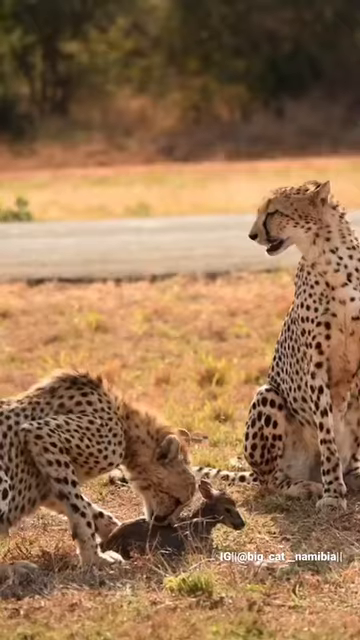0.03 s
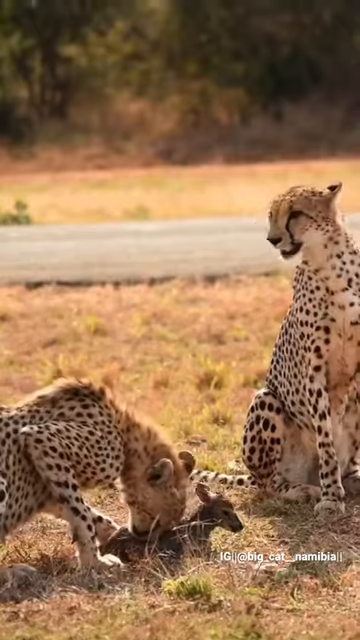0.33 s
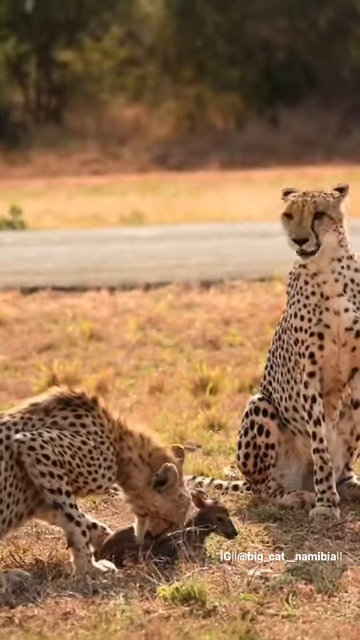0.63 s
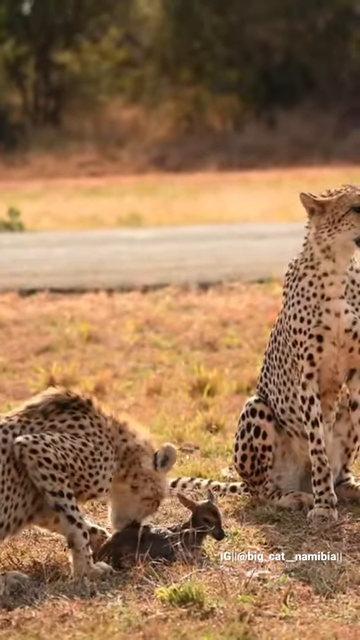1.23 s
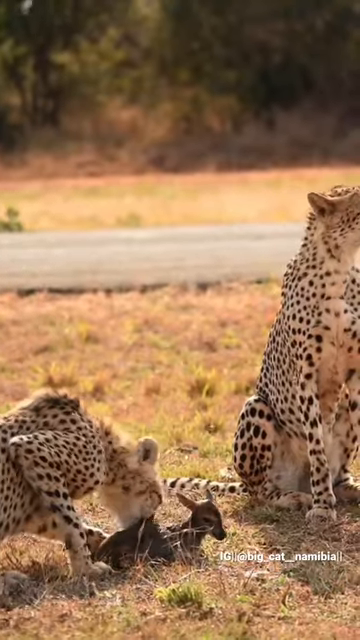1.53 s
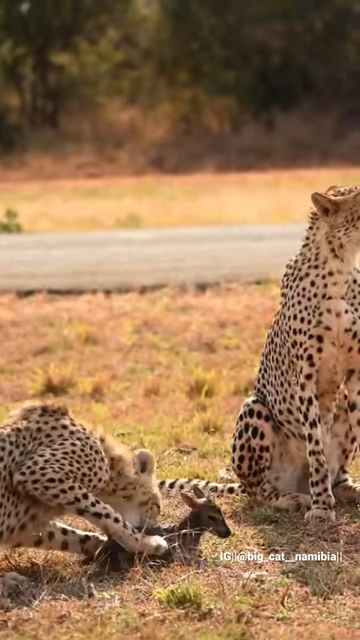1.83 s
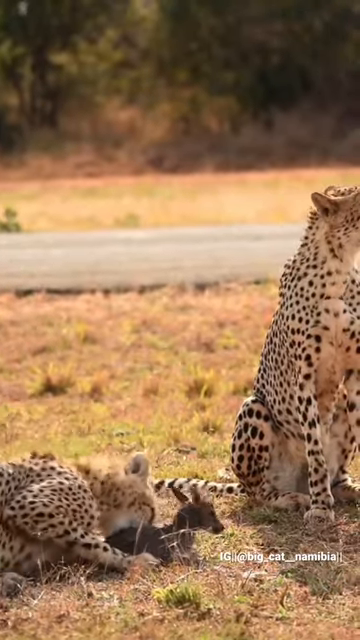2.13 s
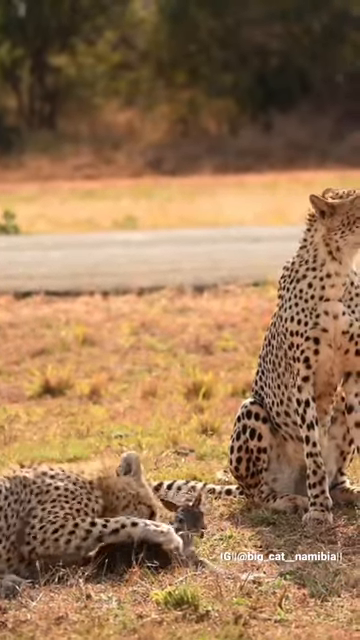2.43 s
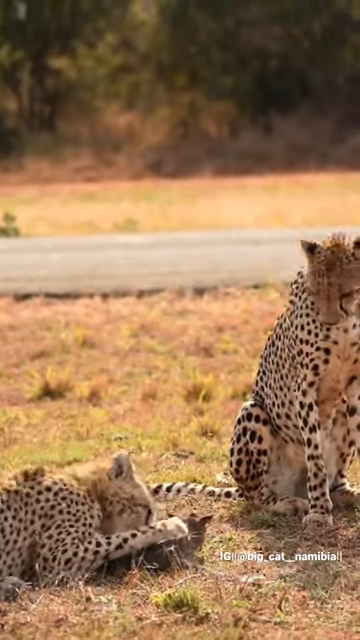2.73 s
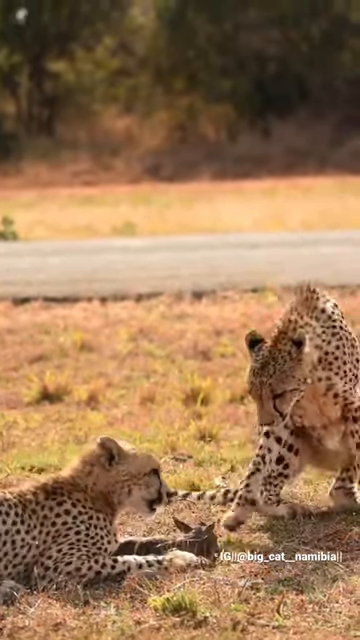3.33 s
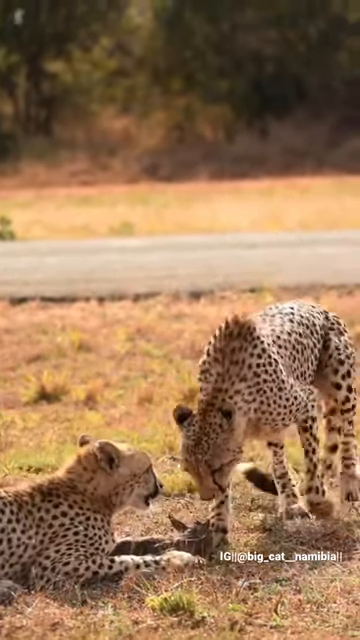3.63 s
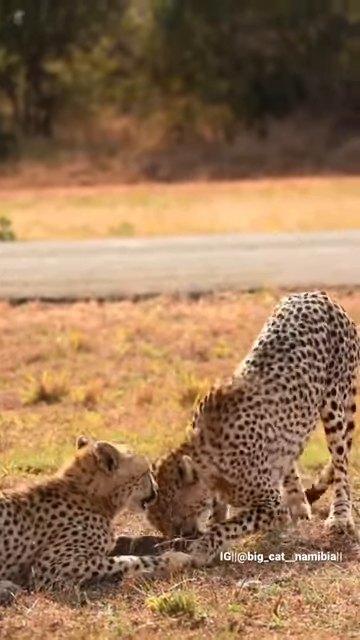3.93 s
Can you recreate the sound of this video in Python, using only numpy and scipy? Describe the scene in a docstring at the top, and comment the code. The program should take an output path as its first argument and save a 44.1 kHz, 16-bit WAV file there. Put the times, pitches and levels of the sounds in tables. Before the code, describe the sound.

A young antelope gives one long, high bleat amid wind thumping on the microphone.

```python
"""Antelope calf in the wind

On open grassland a young antelope, held down by a cheetah, gives one long, high, slightly raspy
bleat, near the middle between the two microphone ports. Gusts rumble and thump right on the ports,
each on its own. Far behind lie a soft hiss of grass, a wavering hum and a few thin bird chirps."""
import sys
import numpy as np
from scipy import signal
from scipy.fft import rfft, irfft, next_fast_len
from scipy.io import wavfile
from scipy.ndimage import map_coordinates

SR = 44100
rng = np.random.default_rng(int(sys.argv[2]) if len(sys.argv) > 2 else 0)


def generate_wav(sig):
    """Save sig (samples, or channels by samples) to the path in sys.argv[1] as 16-bit PCM at SR."""
    pcm = np.round(np.clip(np.atleast_2d(sig).T, -1, 1) * 32767).astype(np.int16)
    wavfile.write(sys.argv[1], SR, pcm)


N = 176400


def amp(db):
    """Decibels to gain."""
    return 10 ** (np.asarray(db) / 20)


def unit(x):
    """Scale to rms 1."""
    return x / np.sqrt(np.mean(x ** 2) + 1e-20)


def along(points, hz):
    """Interpolate (freq_hz, value) points on a log frequency axis."""
    freqs, values = np.transpose(points)
    return np.interp(np.log(hz + 1), np.log(freqs + 1), values)


def curves(rows, outside=None):
    """One value per sample for each column after the time."""
    times, *columns = np.transpose(rows)
    return [np.interp(np.arange(N) / SR, times, column, outside, outside) for column in columns]


def wobble(rate, size=N):
    """A smooth random curve, rate knots a second."""
    at = np.arange(size) * rate / SR
    knots = rng.standard_normal(int(at[-1]) + 4)
    return np.interp(at, at[::32], map_coordinates(knots, [at[::32]]))


def filtered(x, response):
    """Filter x by a gain given as a function of frequency."""
    size = next_fast_len(N + SR // 2)
    return irfft(rfft(x, size) * response(np.fft.rfftfreq(size, 1 / SR)), size)[..., :N]


def noise(colour):
    """Coloured noise of rms 1."""
    return unit(filtered(rng.standard_normal(N), lambda hz: amp(along(colour, hz))))


def add(out, start_s, x):
    """Mix x into out from start_s on."""
    part = out[..., round(start_s * SR):][..., :x.shape[-1]]
    part += x[..., :part.shape[-1]]


def glide(length_s, from_hz, to_hz, waver, rate):
    """A tone that wavers in pitch and level, with a rounded rise and fall."""
    u = np.linspace(0, 1, int(length_s * SR))
    hz = (from_hz + (to_hz - from_hz) * u) * (1 + waver * wobble(rate, len(u)))
    envelope = np.sin(np.pi * u) * amp(6.1 * wobble(rate, len(u)))
    return envelope * np.sin(2 * np.pi * np.cumsum(hz) / SR)


def grassland(x, wet_db, t60_s):
    """Add a short scatter from ground and bushes, different at each port."""
    t = np.arange(SR // 2) / SR
    tail = rng.standard_normal((2, len(t))) * amp(-60 * t / t60_s)
    tail /= np.linalg.norm(tail[0])
    return x + amp(wet_db) * signal.fftconvolve(x[None], tail, axes=1)[:, :N]


# Air and grass all around the microphone: freq_hz, relative_density_db
HUSH_COLOUR = [(25, -17.5), (64, -4), (130, -4.5), (190, -14), (265, -5), (430, -19), (600, -20.5),
               (900, -21.5), (3600, -30), (11000, -35.5), (13000, -42.5)]
# How alike the two ports hear it: freq_hz, correlation
HUSH_LIKENESS = [(60, 0.22), (230, 1), (870, 0.7), (3300, 0.23)]

def hush():
    """The steady hush of the open plain, narrowest in the low mids and wide in the hiss."""
    def mid_side_gains(hz):
        angle = np.arccos(along(HUSH_LIKENESS, hz)) / 2
        return np.array([np.cos(angle), np.sin(angle)])
    mid, side = filtered(np.array([noise(HUSH_COLOUR), noise(HUSH_COLOUR)]), mid_side_gains)
    return amp(-48.5 + 0.18 * wobble(5.5)) * unit(np.array([mid + side, mid - side]))


# A hum far across the plain: start_s, length_s, pitch_hz, level_db
HUM_TONES = [(0.17, 0.29, 243, -43), (0.637, 0.17, 319.4, -39.5), (0.59, 0.8, 280, -48),
             (0.7, 0.74, 240, -49.5)]

def far_hum():
    """Low, distant tones that come and go and waver."""
    out = np.zeros(N)
    for start_s, length_s, pitch_hz, level_db in HUM_TONES:
        add(out, start_s, amp(level_db) * glide(length_s, pitch_hz, pitch_hz, waver=0.0154, rate=24.3))
    return out


# Birds a long way off: start_s, length_s, from_hz, to_hz, level_db
BIRD_CHIRPS = [(0.396, 0.055, 4260, 5220, -60), (0.459, 0.029, 3520, 4140, -61),
               (0.879, 0.067, 8000, 6500, -58), (3.512, 0.054, 3900, 4540, -58),
               (3.588, 0.035, 5480, 5080, -59), (3.682, 0.036, 5600, 8000, -57.5),
               (3.757, 0.04, 4900, 6900, -57.5)]

def far_birds():
    """Thin, quick whistled glides."""
    out = np.zeros(N)
    for start_s, length_s, from_hz, to_hz, level_db in BIRD_CHIRPS:
        add(out, start_s, amp(level_db) * glide(length_s, from_hz, to_hz, waver=0.0295, rate=220))
    return out


# Gusts reaching the microphone: start_s, length_s, level_db
WIND_GUSTS = [(0.163, 0.027, -45), (0.419, 0.18, -41.5), (0.504, 0.033, -27), (1.122, 0.055, -31.5),
              (1.258, 0.098, -28), (1.42, 0.038, -17.5), (1.475, 0.067, -30.5), (1.523, 0.038, -19),
              (1.561, 0.027, -16), (1.615, 0.062, -14), (1.7, 0.11, -29.5), (1.784, 0.12, -24),
              (1.937, 0.18, -29), (2.156, 0.12, -20.5), (2.31, 0.033, -18.5), (2.374, 0.088, -28.5),
              (2.543, 0.13, -34.5), (2.719, 0.085, -33), (2.988, 0.032, -32.5), (3.136, 0.27, -30),
              (3.294, 0.047, -19.5), (3.506, 0.042, -22.5), (3.567, 0.021, -14), (3.614, 0.0054, -14),
              (3.645, 0.029, -15.5), (3.704, 0.15, -16), (3.869, 0.13, -22.5)]
# Turbulence at a port in a full gust, and the extra each band loses as the wind weakens:
# low_hz, high_hz, relative_db, extra_db_per_db
TURBULENCE_BANDS = [(28.6, 76.6, -8.5, -0.45), (64.7, 188, 0.5, 0), (200, 359.5, -3, 1.12),
                    (366, 655, -11, 2), (646, 1142, -22, 3.5), (1110, 2160, -36.5, 1.5)]

def wind_rumble():
    """Both ports share the gusts, each with its own turbulence; stronger wind sheds higher eddies."""
    rise_s, fall_s, lull_db, full_gust_db = 0.0078, 0.026, -57.5, -14.5
    t = np.arange(N) / SR
    power = amp(lull_db + 0.72 * wobble(8.76)) ** 2
    for start_s, length_s, level_db in WIND_GUSTS:
        end_s = start_s + length_s
        envelope = np.interp(t, [start_s - rise_s, start_s, end_s, end_s + fall_s], [0, 1, 1, 0])
        power += (amp(level_db) * envelope) ** 2
    gust_db = 10 * np.log10(power)
    lumps = 1.8 * (np.array([wobble(70), wobble(70)]) - .3)
    out = np.zeros((2, N))
    for low_hz, high_hz, relative_db, growth in TURBULENCE_BANDS:
        bandpass = signal.butter(4, [low_hz, high_hz], "band", fs=SR, output="sos")
        band = unit(signal.sosfilt(bandpass, rng.standard_normal((2, N))))
        band_db = gust_db + relative_db + growth * (gust_db - full_gust_db)
        out += band * amp(band_db + (1.5 + growth / 2) * lumps)
    return out


# Single eddies right on the ports: time_s, level_db, centre_hz, left_minus_right_db
PORT_THUMPS = [(0.513, -12.5, 108, 21), (1.267, -12, 86, 10), (1.427, -4.5, 340, -6),
               (1.475, -13, 214, -19), (1.564, 0, 342, -36), (1.582, -11.5, 258, -5),
               (1.6214, -2.5, 294, 31), (1.644, -5, 420, 13), (1.657, -0.5, 406, 29), (1.669, -5, 345, 18),
               (1.693, -6, 188, 29), (1.852, -6.5, 148, 30), (1.887, -10.5, 136, 17), (2.263, -9, 203, -23),
               (2.349, -6, 223, 18), (3.51, -17.5, 140, 5), (3.576, -3.5, 345, -32), (3.587, -3, 293, -25),
               (3.613, -4, 197, -0.5), (3.639, -3, 298, -29), (3.653, -4.5, 230, 7),
               (3.675, -4.5, 222, -21), (3.747, -1, 318, 16), (3.755, -8.5, 196, 2), (3.786, -7, 265, -17),
               (3.833, 0, 288, 15), (3.853, -3, 293, 15), (3.957, -12, 188, -5)]
# The snap of a hard hit on a port: freq_hz, relative_density_db
SNAP_SPECTRUM = [(500, 2.5), (2000, 7.5), (4500, -6.5), (9000, -17), (13000, -33)]

def wind_thumps():
    """Each eddy is a pull, push and pull of pressure, higher the smaller it is; the hardest also snap."""
    full_snap_db, snap_db_per_db, snap_t60_s = -26, 3.3, 0.019
    out = np.zeros((2, N))
    t = np.arange(-SR // 20, SR // 20) / SR
    hiss = noise(SNAP_SPECTRUM)
    for time_s, level_db, centre_hz, pan_db in PORT_THUMPS:
        u = np.pi * centre_hz * t
        pressure = amp(level_db) * (1 - 3 * u ** 2) / (1 + u ** 2) ** 3
        snap_db = full_snap_db + snap_db_per_db * level_db - 60 * np.abs(t) / snap_t60_s
        snap = (t >= 0) * amp(snap_db) * np.roll(hiss, -round(time_s * SR))[:len(t)]
        sides = amp([[pan_db / 2], [-pan_db / 2]])
        add(out, time_s + t[0], sides / sides.max() * (pressure + snap))
    return out


# The calf's breath, as heard at the microphone: time_s, level_db
RASP_LEVEL = [(2.265, -95), (2.28, -50), (2.53, -44), (2.64, -48.5), (2.89, -55.5), (2.97, -54),
              (3.13, -63.5), (3.38, -56), (3.46, -67)]
# Its colour: freq_hz, relative_density_db
RASP_SPECTRUM = [(900, -34), (1400, -48), (2100, -4.5), (2700, -47), (3750, -31), (4300, -2), (5700, 1.5),
                 (6300, -14), (7500, -3.5), (9300, -7.5), (10100, -18), (11300, -6.5), (13000, -26)]

def throat_rasp(phase):
    """Air rasps in the throat, pulsing once per cycle of the voice."""
    breath = unit(noise(RASP_SPECTRUM) * (1 + .6 * np.cos(phase)))
    return breath * amp(curves(RASP_LEVEL, outside=-120)[0] + 1.2 * wobble(29.9))


# Four shapes of the calf's mouth: relative_db for each of harmonics 1 to 15
MOUTH_OPENING = [-31, -3.5, -14, -15.5, -6.5, 0, -8, -9, -15, -15, -21, -15, -38, -24, -24]
MOUTH_GAPING = [-18.5, -2.5, -0.5, -17, -4, -9.5, -3, -17, -13, -7.5, -6, -34, -8.5, -12.5, -26]
MOUTH_NARROWING = [-24.5, -7.5, 0.5, -25, -19, -12.5, -9, -12, -12, -14, -18, -17.5, -19.5, -24, -28]
MOUTH_CLOSING = [-23, -2, 0.5, -13.5, -7.5, -12, -7.5, -17, -18, -18, -13, -12, -17, -13, -31]
# Start and end of each change of shape: time_s
MOUTH_TIMES = [2.37, 2.44, 2.7, 2.87, 3.04, 3.15]

def mouth_shape_db(t, harmonic_hz):
    """The moving mouth weights the harmonics; a throat resonance stands out as it closes."""
    throat_hz, half_width_hz, throat_db = 4650, 280, 17
    shapes = [MOUTH_OPENING, MOUTH_GAPING, MOUTH_GAPING, MOUTH_NARROWING, MOUTH_NARROWING, MOUTH_CLOSING]
    shape_db = np.array([np.interp(t, MOUTH_TIMES, levels) for levels in np.transpose(shapes)])
    closed = np.interp(t, MOUTH_TIMES[-2:], [0, 1])
    return shape_db + closed * throat_db / (1 + ((harmonic_hz - throat_hz) / half_width_hz) ** 2)


# The calf's cry, rising and then sagging: time_s, pitch_hz
BLEAT_PITCH = [(2.271, 712), (2.334, 791), (2.396, 802), (2.449, 830), (2.562, 846.6), (2.659, 823.3),
               (2.741, 832.8), (2.811, 818.5), (2.889, 818.5), (2.999, 802.7), (3.12, 779), (3.26, 759),
               (3.35, 710), (3.44, 622)]
# Its three registers at the microphone: time_s, low_db, middle_db, treble_db
BLEAT_LEVELS = [(2.24, -58, -82, -88), (2.272, -57, -62, -82), (2.28, -42.5, -42, -48),
                (2.33, -41, -31.5, -43), (2.39, -36, -31.5, -39.5), (2.44, -33, -31, -33),
                (2.56, -30, -40.5, -37), (2.65, -34.5, -48, -40), (2.77, -31.5, -38.5, -39),
                (2.92, -30.5, -40, -38.5), (3.07, -34, -41.5, -42.5), (3.115, -42.5, -50.5, -51),
                (3.28, -44, -47, -56), (3.32, -45.5, -64, -61), (3.38, -44.5, -46, -71),
                (3.45, -63.5, -68, -80)]

def bleat():
    """A stack of harmonics, shaped by the mouth and frayed at the top, over a rasp of breath."""
    middle_from_hz, treble_from_hz, jitter, shimmer = 3600, 6200, 0.0013, 0.067
    t = np.arange(N) / SR
    pitch_hz = curves(BLEAT_PITCH)[0] * (1 + jitter * wobble(160) + 0.00059 * wobble(24.8))
    phase = 2 * np.pi * np.cumsum(pitch_hz) / SR
    voiced = (t > BLEAT_LEVELS[0][0]) & (t < BLEAT_LEVELS[-1][0])
    orders = np.arange(1, len(MOUTH_GAPING) + 1)[:, None]
    typical_hz = orders * np.median(np.array(BLEAT_PITCH)[:, 1])

    def wobble_each(rate):
        return np.array([wobble(rate, voiced.sum()) for _ in orders])
    shape_db = mouth_shape_db(t[voiced], orders * pitch_hz[voiced])
    drift_db = 2.42 * np.sqrt(orders / orders.mean()) * wobble_each(24.88)
    fray_depth = .29 * np.minimum(typical_hz / middle_from_hz, 1) ** 4
    fray = 1 + fray_depth * (wobble_each(90) + .5j * wobble_each(90))  # in level and in phase
    harmonics = amp(shape_db + drift_db) * np.imag(fray * np.exp(1j * orders * phase[voiced]))
    register = np.digitize(typical_hz[:, 0], [middle_from_hz, treble_from_hz])
    voice = np.zeros(N)
    for i, level_db in enumerate(curves(BLEAT_LEVELS)):
        shape_rms = np.sqrt(np.sum(amp(shape_db[register == i]) ** 2, axis=0) / 2)
        voice[voiced] += amp(level_db[voiced]) * harmonics[register == i].sum(axis=0) / shape_rms
    rasp = throat_rasp(phase)
    return voice * (1 + shimmer * wobble(200)) + rasp


def scene():
    """The calf near the middle, wind on the ports, the plain behind."""
    calf = grassland(bleat(), wet_db=-20, t60_s=0.077) * amp([[-.3], [.3]])
    birds = grassland(far_birds(), wet_db=-3, t60_s=0.13)  # from so far off, much is scatter
    hum = grassland(far_hum(), wet_db=-40, t60_s=0.18)
    return calf + wind_rumble() + wind_thumps() + hush() + birds + hum


def record(dry):
    """The recorder opens after a moment, clips at full scale and keeps nothing above its band limit."""
    open_s, fade_s, top_hz = 0.147, 0.01, 13150
    opened = np.clip((np.arange(N) / SR - open_s) / fade_s + .5, 0, 1)
    return filtered(np.clip(dry * opened, -1, 1), lambda hz: hz < top_hz)


dry = scene()
out = record(dry)
generate_wav(out)
```